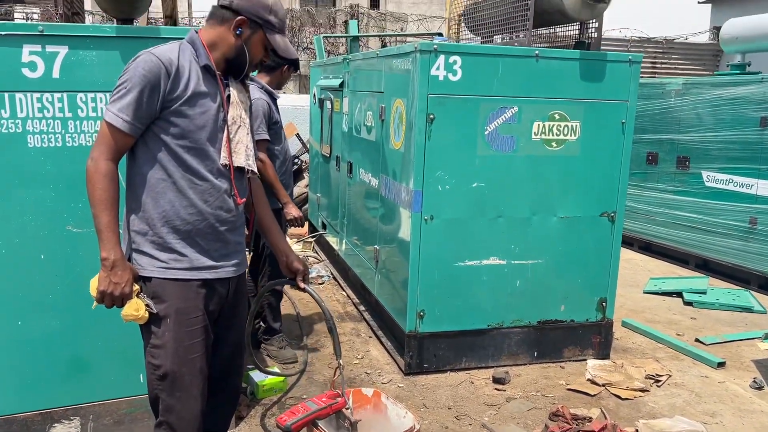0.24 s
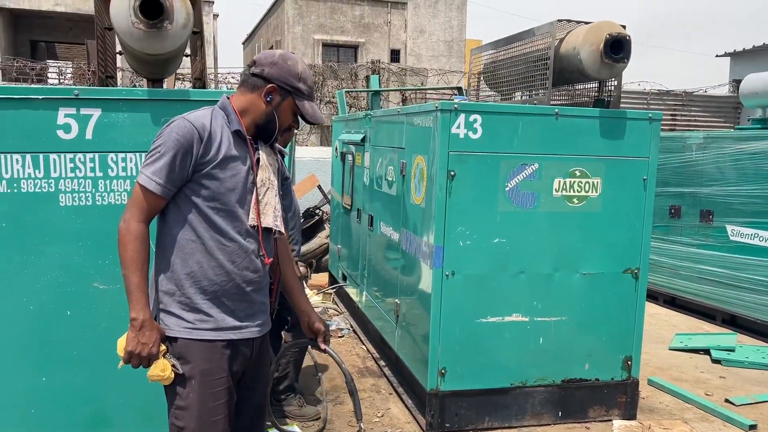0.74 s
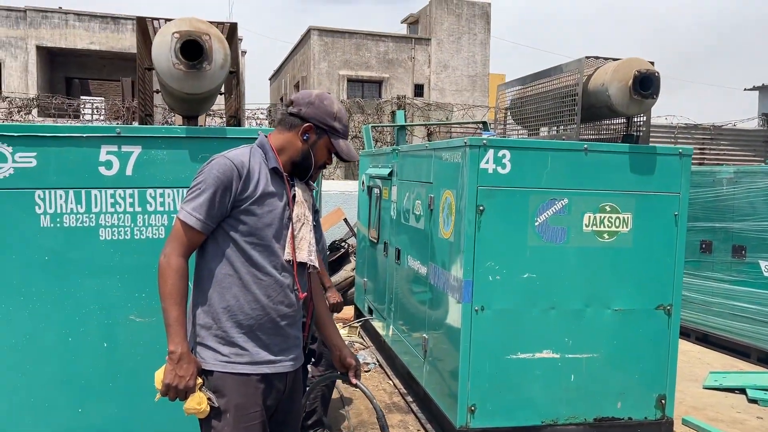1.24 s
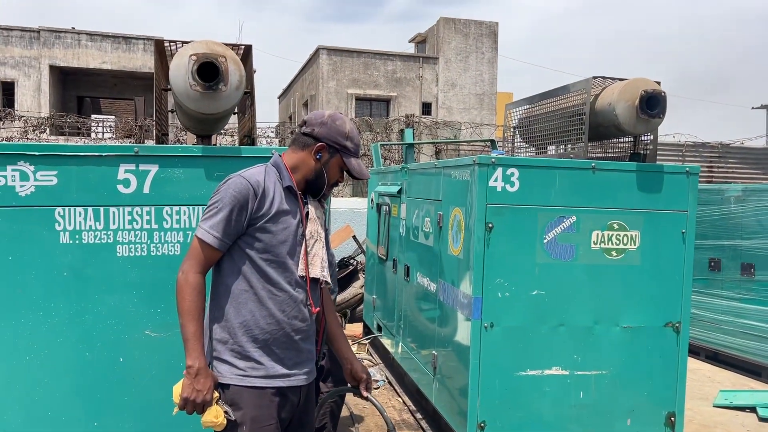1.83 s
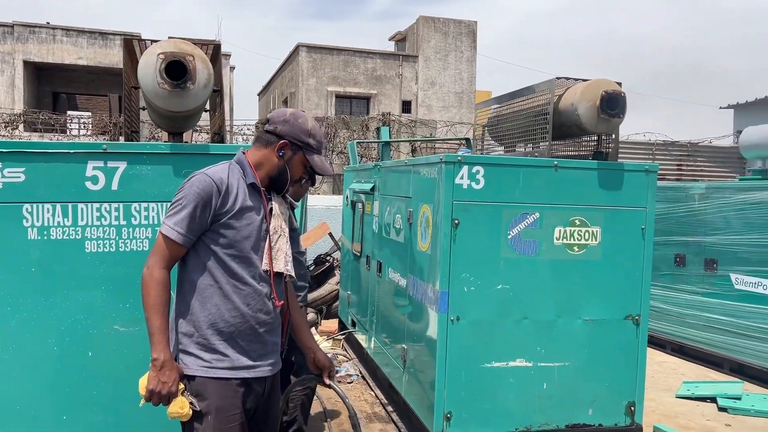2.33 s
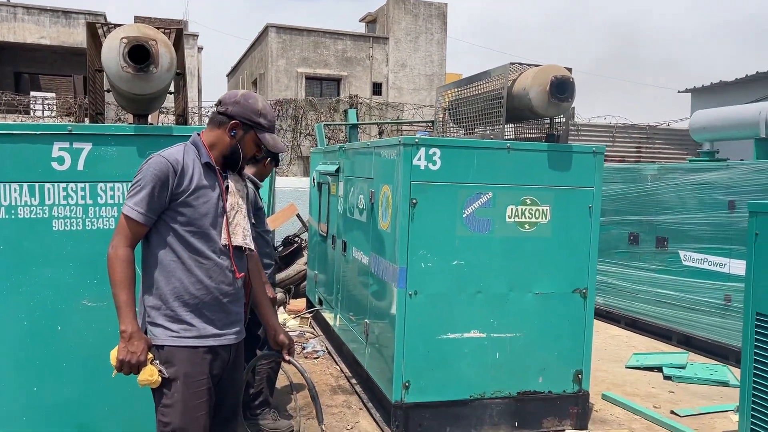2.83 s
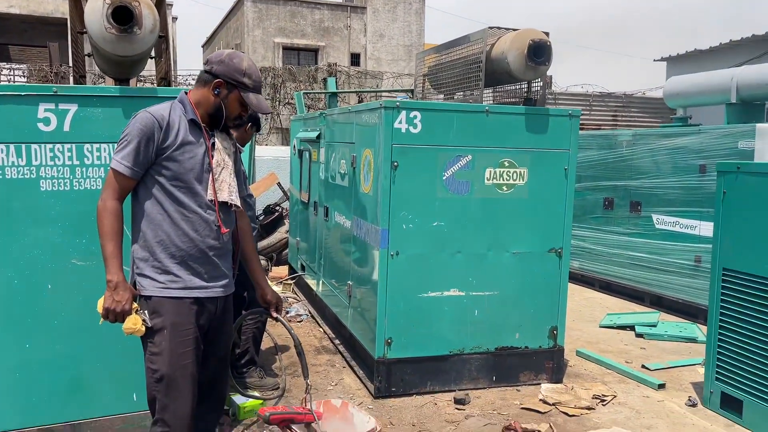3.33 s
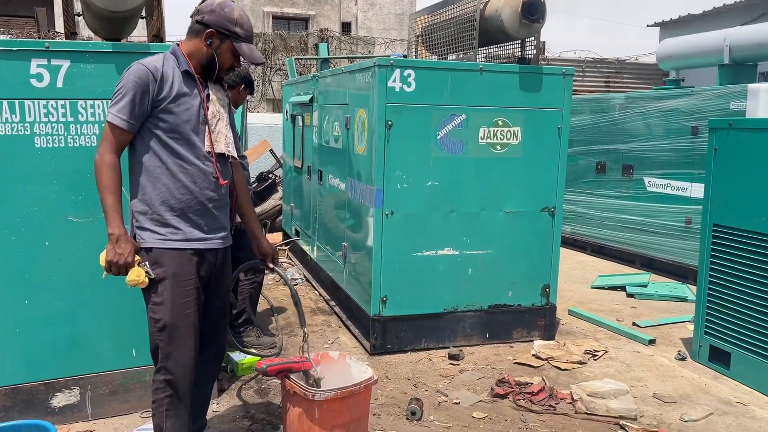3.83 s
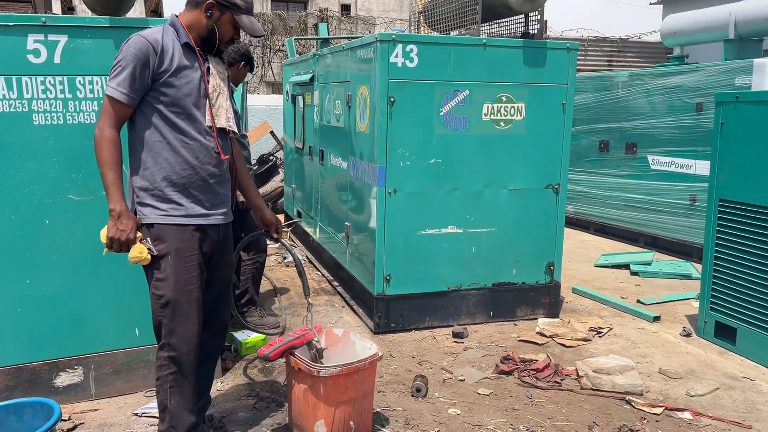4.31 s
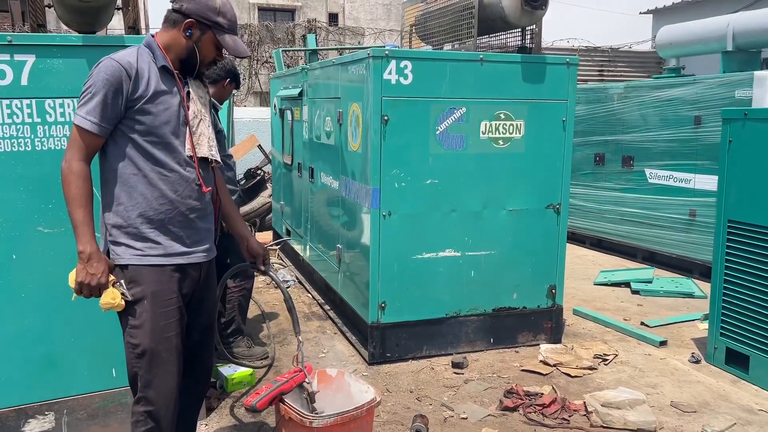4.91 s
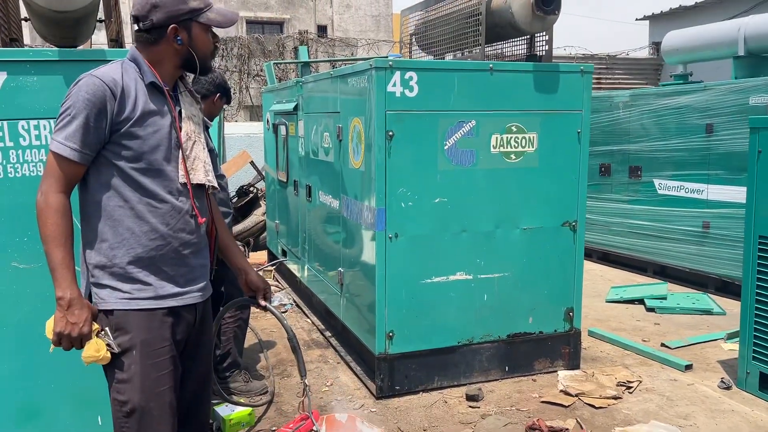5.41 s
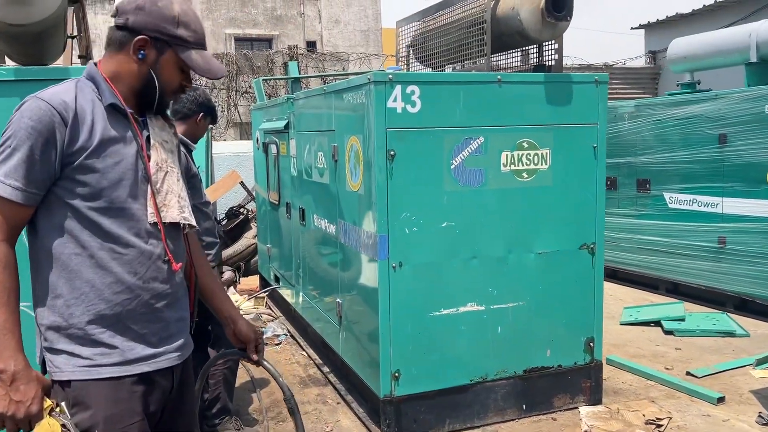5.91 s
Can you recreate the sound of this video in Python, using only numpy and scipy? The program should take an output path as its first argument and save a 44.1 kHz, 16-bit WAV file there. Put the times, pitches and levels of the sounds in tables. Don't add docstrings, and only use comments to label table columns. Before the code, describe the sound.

Continuous engine drone outdoors beside a steel-cased generator: thick low hum, fast lumpy clatter, metallic panel ringing and a thin wavering whine. The bass stays centred while the treble spreads wide. The hum swells midway with a very slight dip in engine speed, then eases as the mechanical clatter grows nearer. A few faint, bright grit ticks appear around three seconds and near the end.

```python
import sys
import numpy as np
from scipy import signal
from scipy.fft import rfft, irfft
from scipy.io import wavfile

SR = 44100
rng = np.random.default_rng(int(sys.argv[2]) if len(sys.argv) > 2 else 0)


def voltage_ratio(decibels):
    exponent = np.asarray(decibels, float) / 20
    return 10 ** exponent


def unload_wav(signal):
    wavfile.write(
        sys.argv[1],
        SR,
        np.round(np.clip(np.atleast_2d(signal).T, -1, 1) * 32767).astype(np.int16),
    )


N = 271215
TIME_S = np.arange(N) / SR
MEAN_RPM = 1455
PORT_SIGNS = np.array([[1], [-1]])


def rms_one(x):
    return x / np.sqrt(np.mean(x ** 2) + 1e-20)


def in_time(rows):
    s, *columns = np.transpose(rows)
    return [np.interp(TIME_S, s, c) for c in columns]


def at_hz(points, hz):
    point_hz, value = np.transpose(points)
    return np.interp(np.log(hz + 1e-9), np.log(point_hz), value)


def drift(rate_hz):
    r = np.exp(-80 * np.pi * rate_hz / SR)
    slow = signal.lfilter([1], [1, -2 * r, r * r], rng.standard_normal(N // 40 + 2002))[2000:]
    return np.interp(np.arange(N) / 40, np.arange(len(slow)), rms_one(slow))


def coloured(spectrum):
    gain = voltage_ratio(at_hz(spectrum, np.fft.rfftfreq(N, 1 / SR)))
    return rms_one(irfft(rfft(rng.standard_normal(N)) * gain, N))


def band_pass(x, low_hz, high_hz):
    return signal.sosfilt(signal.butter(2, [low_hz, high_hz], "band", fs=SR, output="sos"), x)


def peak(x, hz, q):
    return signal.lfilter(*signal.iirpeak(hz, q, fs=SR), x)


def ring(clicks, hz, t60_s):
    r, w = voltage_ratio(-60 / (t60_s * SR)), 2 * np.pi * hz / SR
    return signal.lfilter([0, np.sin(w)], [1, -2 * r * np.cos(w), r * r], clicks + 1e-18)


# time in seconds, speed in rpm.
SPEED = [(0.0, 1455.34), (1.561, 1454.95), (2.63, 1456.86), (3.159, 1446.46), (4.163, 1456.73),
         (6.15, 1462.52)]


def crank():
    rpm, = in_time(SPEED)
    return rpm, -.042 + np.cumsum(rpm) / (120 * SR)


def firings(cycle, lead):
    count = 4 * cycle + lead + 4
    return count.astype(int), count % 1


# time in seconds, place in the boom's standing wave 0-1,
# turned aside 0-1, gain from nearness in dB.
HAND = [(0, .1, 0, 0), (.7, .1, 0.4, 0), (1.2, .2, 0.7, -1), (1.75, .3, 1, -0.5), (2.3, .45, .55, -0.6),
        (2.7, .7, .05, 0), (3.3, 0.94, 0.03, 1), (4.3, 0.92, 0, .3), (5.1, 0.6, 0.11, 1.5),
        (5.7, .15, .05, 1.7), (6.15, 0.14, 0, 3.5)]


def hand():
    place, aside, near_db = in_time(HAND)
    loud_spot_s, width_s = 4.25, .5
    swell = np.exp(-.5 * ((TIME_S - loud_spot_s) / width_s) ** 2)
    return place, aside, near_db, swell


# frequency in Hz, level in dB per Hz.
AIR = [(10000, -29), (11300, -5.5), (12300, -8.5), (12850, -16), (13200, -4), (15000, -0.5)]


def air():
    level_db = -73.5 + 1.5 * drift(4)
    return voltage_ratio(level_db) * (coloured(AIR) + .7 * coloured(AIR) * PORT_SIGNS)


# time in seconds, peak level in dB.
TICKS = [(3.0704, -45), (5.4054, -44), (5.7184, -43), (5.7374, -43), (5.7768, -46)]


def ticks():
    fade_s = .004
    clicks = np.zeros(N)
    clicks[[round(s * SR) for s, db in TICKS]] = voltage_ratio(np.array(TICKS)[:, 1] + 4.5)
    fade = signal.lfilter([1], [1, -np.exp(-1 / (fade_s * SR))], clicks + 1e-18)
    return band_pass(fade * rng.standard_normal(N), 4000, 10000)


# frequency in Hz, level in dB rms.
SLOT_TONES = [(9503, -80), (9697, -80.5)]


def slot_tones():
    return sum(np.sqrt(2) * voltage_ratio(db) * np.sin(2 * np.pi * hz * TIME_S) for hz, db in SLOT_TONES)


def singing(hz, t60_s, level_db):
    once = ring(rng.standard_normal(N), hz, t60_s)
    return voltage_ratio(level_db) * rms_one(ring(once, hz, t60_s))


# frequency in Hz, level in dB per Hz.
RUMBLE = [(22, -30.5), (36, -17.5), (50, 5.5), (75, 12), (97, 8), (125, 2), (200, 2.5), (320, -5.5),
          (400, -10.5), (438, -5), (480, -11.5), (600, -8.5), (700, -12.5), (900, -52)]


def rumble(place):
    level_db = -35.5 - 2.55 * place
    return voltage_ratio(level_db + 5.5 + 1.1 * drift(3.1)) * coloured(RUMBLE)


# frequency in Hz, band level in dB.
CLATTER = [(380, -33), (650, -4), (864, -2.5), (1100, -2.5), (1720, 0.5), (2200, -3), (2600, -1),
           (2790, -7.5), (3500, -12), (4710, -12), (9810, -24.5), (11000, -36.5), (12800, -48),
           (15000, -40)]
# frequency in Hz, depth in dB.
PULSING = [(600, 3), (1700, 2), (3500, 3), (6000, 1), (9000, 3)]


def clatter(cycle, block_db, knock_db, hiss_db):
    number, since = firings(cycle, .2)
    force = 1 + .35 * rng.standard_normal((number.max() + 1, 3))
    swell = (1 - np.exp(-since / 0.023)) * np.exp(-since / 0.74) * 2 - .5
    change_db = [c - c.mean() for c in (block_db, knock_db, hiss_db)]
    white = rng.standard_normal((2, N))
    edges_hz = 500 * 2 ** np.arange(0, 5.1, 1 / 3)
    out = 0
    for k, (low, high) in enumerate(zip(edges_hz, edges_hz[1:])):
        hz = np.sqrt(low * high)
        zone = int(hz > 3000) + int(hz > 5200)
        pulse_db = at_hz(PULSING, hz) * swell * force[number, zone]
        level_db = at_hz(CLATTER, hz) + change_db[zone] + pulse_db + drift(3.9)
        out = out + voltage_ratio(level_db) * band_pass(white[k % 2], low, high)
    return voltage_ratio(-40) * rms_one(out)


# frequency in Hz, level in dB, t60 in seconds.
PANELS = [(556, -41.5, 0.053), (605, -44.5, 0.12), (828, -50, 0.073), (935, -46.5, 0.16),
          (1009, -42, 0.051), (1187, -49.5, 0.17), (1347, -44.5, 0.046), (1640, -55, 0.02),
          (1682, -44, 0.071), (1761, -44.5, 0.057), (2039, -46.5, 0.089), (2557, -41.5, 0.037),
          (3025, -61.5, 0.048)]
BLOCK = [(3440, -54.5, 0.015), (3890, -55, 0.049), (4250, -53.5, 0.03), (5370, -55, 0.038),
         (5780, -56, 0.029), (6020, -54.5, .025), (7040, -58.5, 0.025), (10300, -72.5, .04)]
CYLINDER_DB = [-1.3, -1.4, 1.5, 0]


def knocks(cycle, modes, level_db, spread_db, burst):
    number, since = firings(cycle, .13)
    blow = rng.standard_normal(N) * np.exp(-since / burst) / np.sqrt(burst * SR / 100)
    out = 0
    for hz, mode_db, t60_s in modes:
        chance_db = spread_db * rng.standard_normal(number.max() + 1)[number]
        force_db = np.array(CYLINDER_DB)[number % 4] + chance_db
        out = out + ring(blow * voltage_ratio(mode_db + force_db + 0.97 * drift(3.7)), hz, t60_s)
    return out * voltage_ratio(level_db - level_db.mean())


def gas_pings(cycle, rpm, place, aside):
    number, since = firings(cycle, 0.21)
    draw = rng.standard_normal((number.max() + 1, 3))[number].T
    shape = (1 - np.exp(-since / .08)) * np.exp(-since / .24)
    scatter_hz = 90 * (1 - 1.1 * place)
    hz = 4790 - 5.1 * (rpm - MEAN_RPM) + 15 * drift(4) + scatter_hz * draw[0]
    phase = 2 * np.pi * np.cumsum(hz) / SR + 10 * draw[1]
    port_rad = -1.65 - 1.5 * aside
    level_db = -56 + 5 * place + 2 * aside
    force = voltage_ratio(level_db + np.array(CYLINDER_DB)[number % 4] + 3.5 * draw[2])
    return force * rms_one(shape * np.cos(phase + port_rad / 2 * PORT_SIGNS))


# time in seconds, extra path in m.
WALL_PATH = [(0, 1.66), (1.5, 2.0), (3, 1.85), (4.5, 1.8), (6.15, 1.98)]


def wall(x, echo_db):
    late = np.arange(N) - in_time(WALL_PATH)[0] / 343 * SR
    return x + voltage_ratio(echo_db) * np.interp(late, np.arange(N), x)


# frequency in Hz, side minus mid in dB.
SIDE_DB = [(190, -46), (340, -20), (600, -17.5), (1060, -23.5), (1500, -24.5), (1950, -34), (2400, -9),
           (3360, -3), (5970, -3), (10600, -1)]
# frequency in Hz, share signed by leading port.
DELAY_SHARE = [(2000, 0), (3100, .7), (3800, .3), (4400, -.6), (5000, -.8), (10000, -.75)]


def ports(direct, scattered, spread_db):
    hz = np.fft.rfftfreq(N, 1 / SR)
    share = np.clip(at_hz(DELAY_SHARE, hz), -1, 1)
    mixed = 1j * share * rfft(direct) + np.sqrt(1 - share ** 2) * rfft(scattered)
    side = irfft(voltage_ratio(at_hz(SIDE_DB, hz)) * mixed, N)
    return direct + voltage_ratio(spread_db) * side * PORT_SIGNS


def machine(cycle, place, aside, near_db, swell):
    knock_db = near_db - 0.5 * aside + 1.4 * place
    hiss_db = 0.8 * aside - 0.6 * place
    noise = wall(clatter(cycle, near_db, knock_db, hiss_db), -11) + rumble(place)
    noise = noise + knocks(cycle, PANELS, near_db, 2.1, 0.43)
    noise = noise + knocks(cycle, BLOCK, knock_db, 4.2, 0.23)
    noise = noise + singing(404, 0.12, -49.5 + 6.5 * swell)
    whine_db = -54 - 4.1 * aside + 6 * place + 0.53 * drift(0.83)
    noise = noise + singing(2640, 0.038, whine_db)
    noise = noise + 0.9 * swell * peak(noise, 375, 5)
    noise = noise - (0.41 + 1.1 * swell) * peak(noise, 438, 12)
    scattered = np.roll(noise, round(SR * 120 / MEAN_RPM))
    noise = noise - 0.34 * aside * peak(noise, 4600, 3.5)
    return ports(noise + slot_tones() + ticks(), scattered, -0.8 + 2.5 * aside)


# multiple of the four-stroke cycle, level in dB rms.
ORDERS_DB = [(4, -27.5), (5, -30.5), (6, -40), (7, -37.5), (8, -12), (9, -31), (10, -44), (11, -70.5),
             (12, -27.5), (13, -54.5), (14, -63.5), (15, -43), (16, -42.5), (17, -40), (18, -51), (19, -54),
             (20, -42.5), (22, -50.5), (23, -48), (24, -47.5), (25, -51.5), (28, -49), (29, -47.5),
             (30, -48.5), (32, -64.5), (33, -60.5), (39, -52), (40, -51), (42, -52)]
BOOM_ORDER = 8


def exhaust(cycle, place):
    boom_db = -14.5 + 4.5 * place
    beat, firing = voltage_ratio(0.3 - 0.7 * place), voltage_ratio(-2.5 + 2 * place)
    out = voltage_ratio(boom_db + .16 * drift(2.4)) * np.cos(2 * np.pi * BOOM_ORDER * cycle)
    for order, level_db in ORDERS_DB:
        if order == BOOM_ORDER:
            continue
        lag_rad = rng.uniform(0, 2 * np.pi) if order > 12 else np.pi - .7 * (order % 2 == 0)
        if order == 5:
            lag_rad -= 2 * np.pi / 3
        waver = 0.066 * np.sqrt(order / 8)
        size = voltage_ratio(level_db) * (beat if order % 4 else firing) * (1 + waver * drift(1.4))
        out = out + size * np.cos(2 * np.pi * order * cycle - lag_rad + waver * drift(1.9))
    return np.sqrt(2) * out


def scene():
    rpm, cycle = crank()
    place, aside, near_db, swell = hand()
    noise = machine(cycle, place, aside, near_db, swell)
    return noise + gas_pings(cycle, rpm, place, aside) + exhaust(cycle, place)


def low_pass(x):
    return signal.sosfilt(signal.butter(12, 15720, fs=SR, output="sos"), x)


def record(dry):
    rolled = signal.sosfilt(signal.butter(8, 10900, fs=SR, output="sos"), dry)
    return low_pass(rolled + air())


dry = scene()
out = record(dry)
unload_wav(out)
```